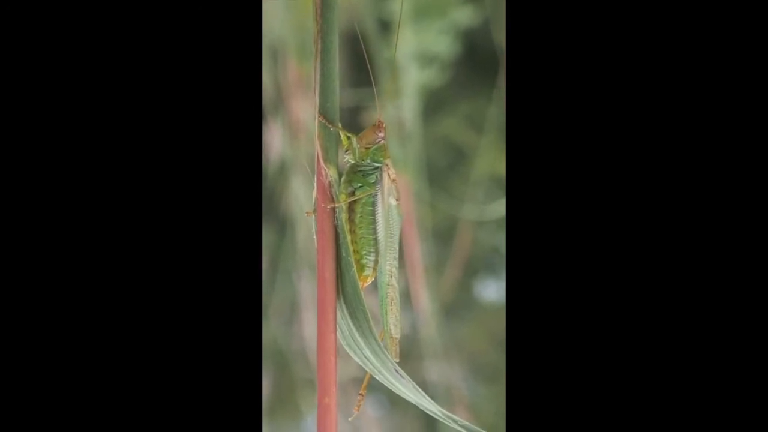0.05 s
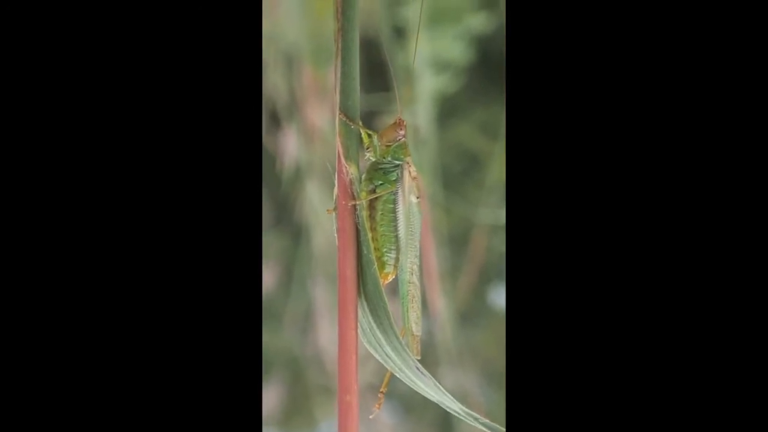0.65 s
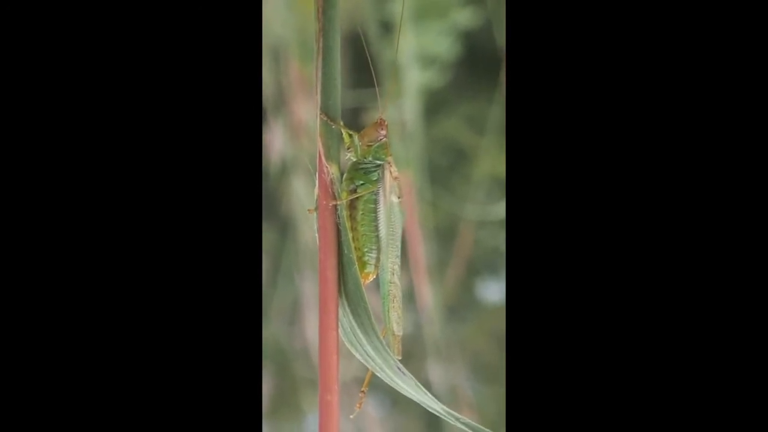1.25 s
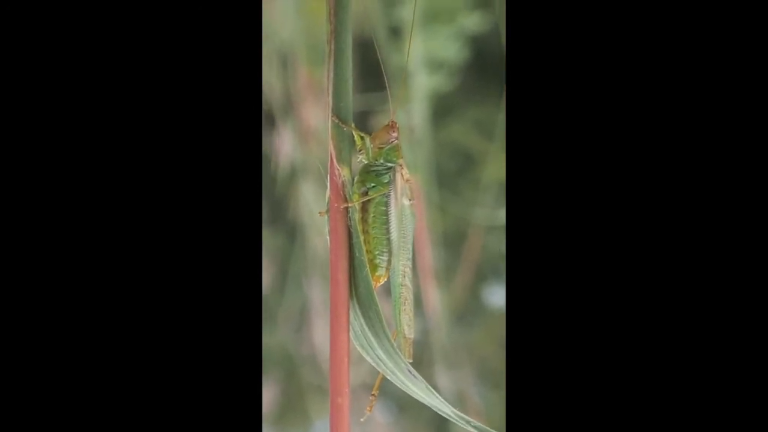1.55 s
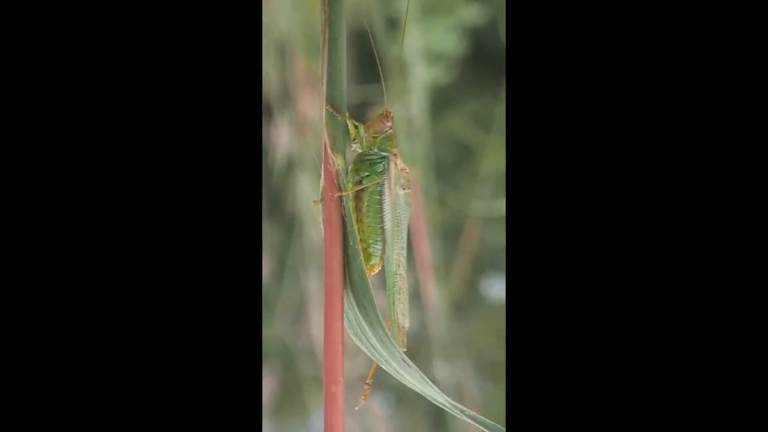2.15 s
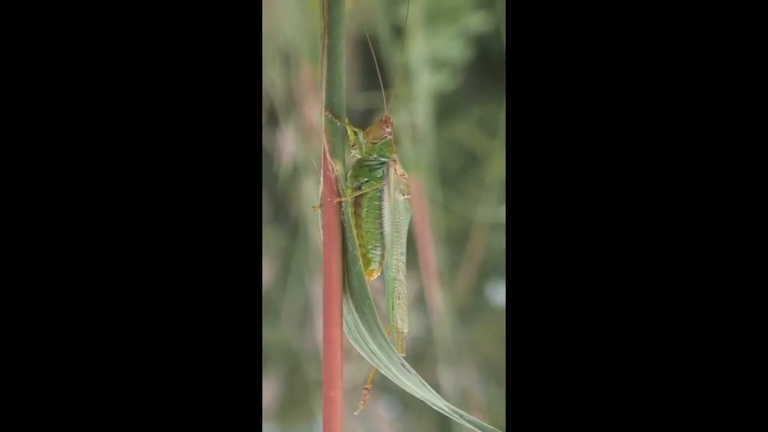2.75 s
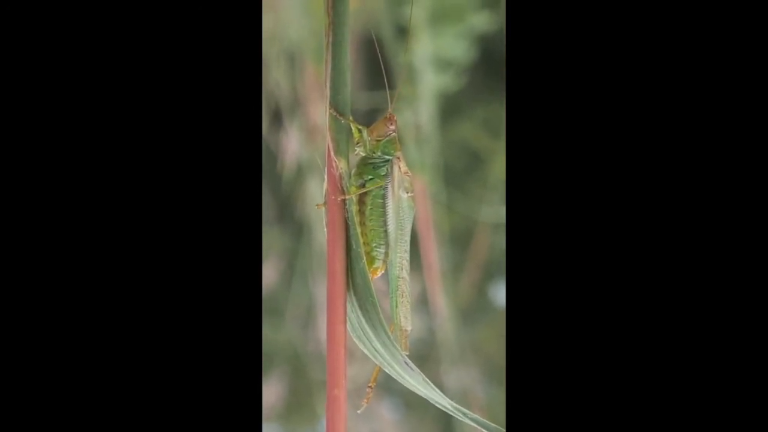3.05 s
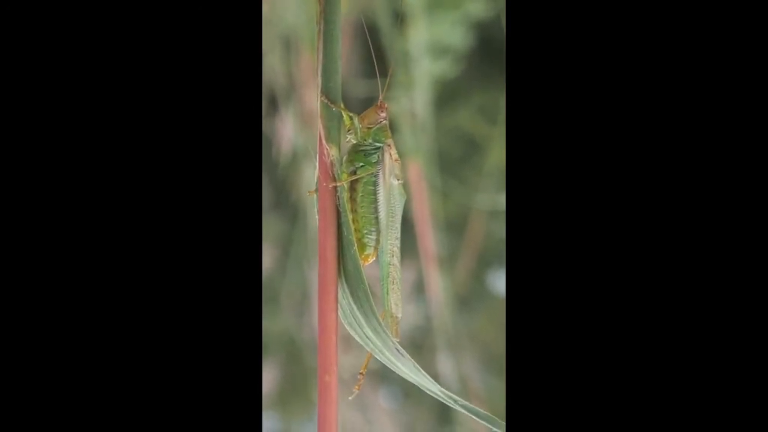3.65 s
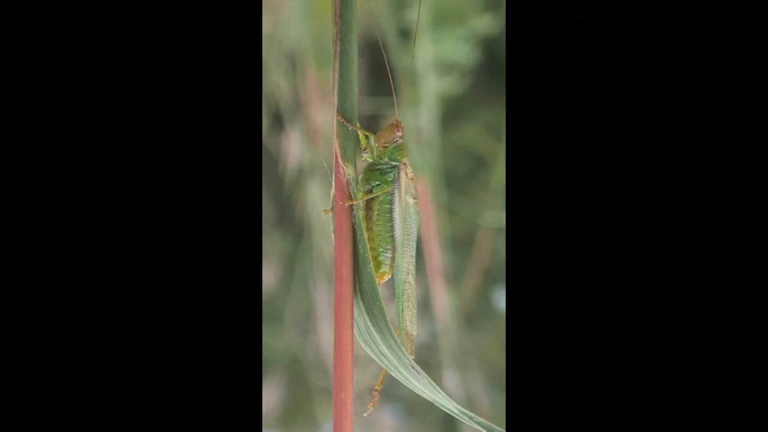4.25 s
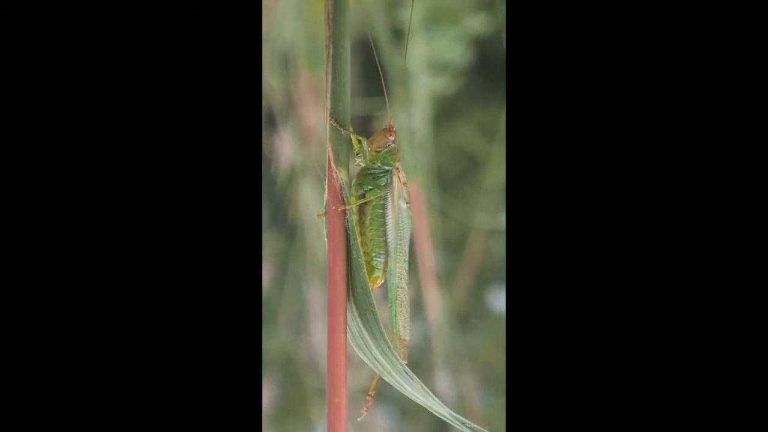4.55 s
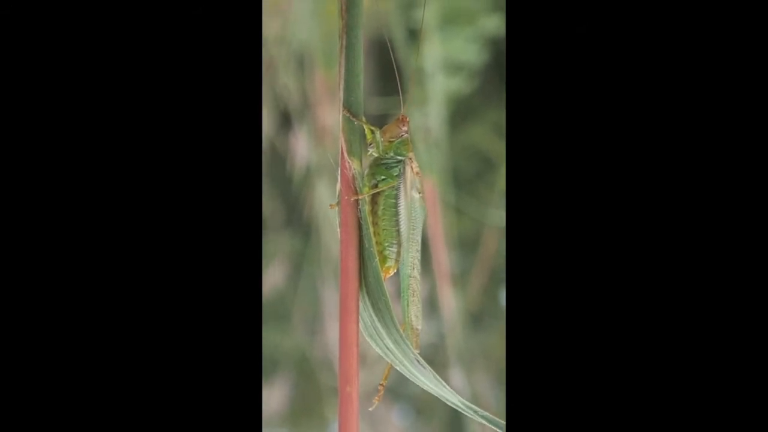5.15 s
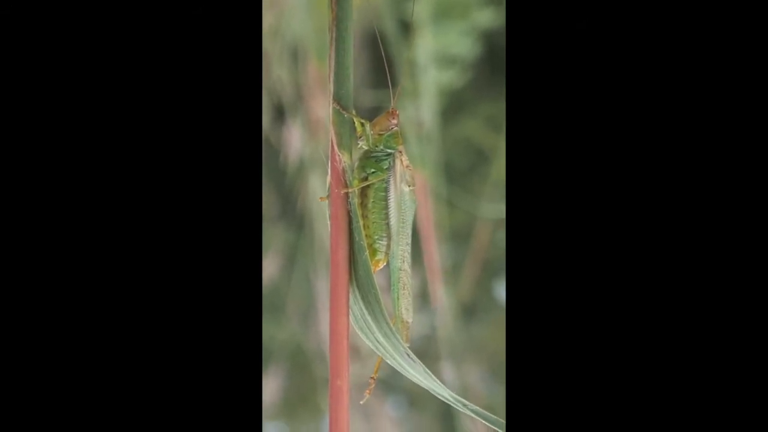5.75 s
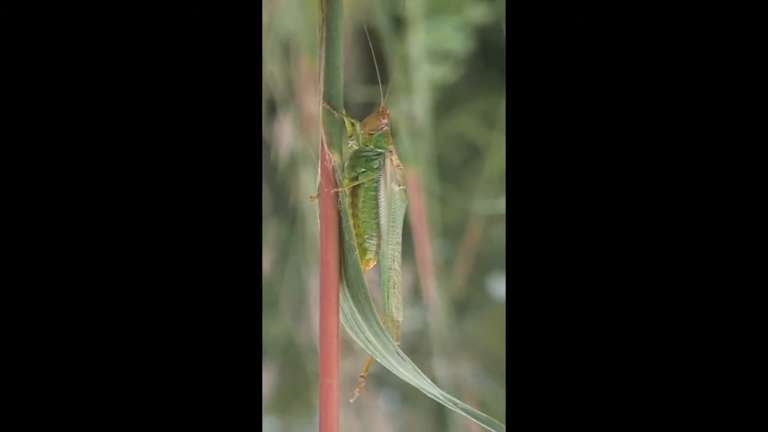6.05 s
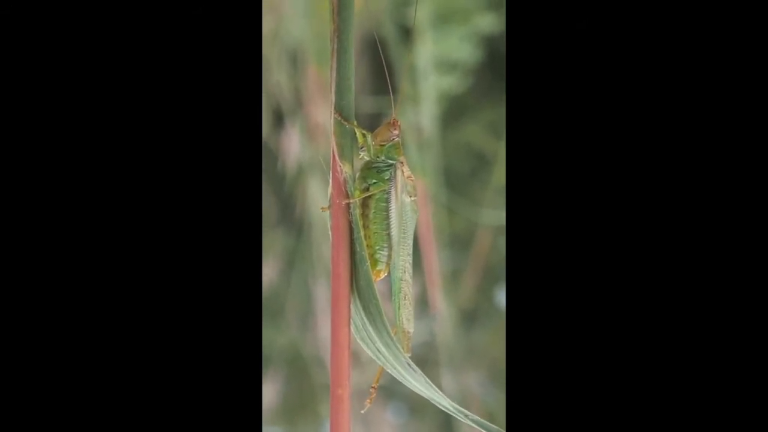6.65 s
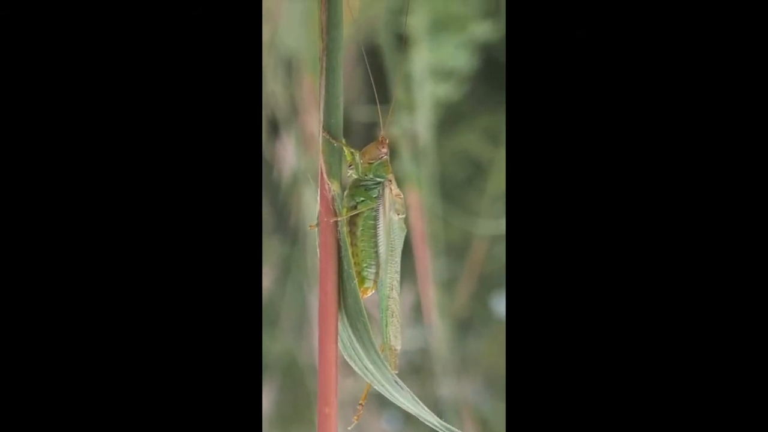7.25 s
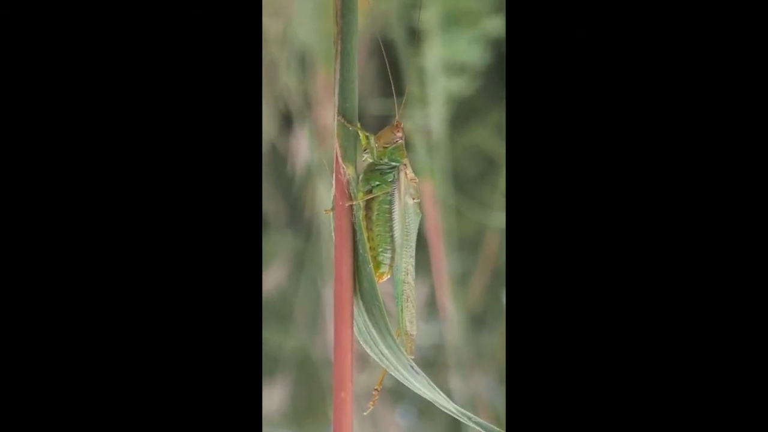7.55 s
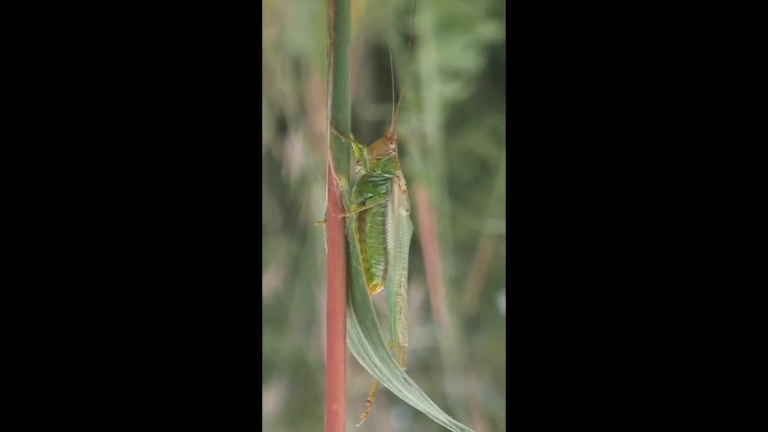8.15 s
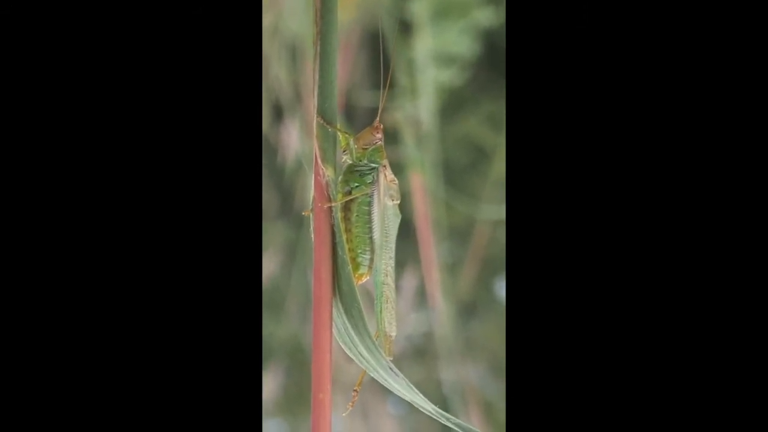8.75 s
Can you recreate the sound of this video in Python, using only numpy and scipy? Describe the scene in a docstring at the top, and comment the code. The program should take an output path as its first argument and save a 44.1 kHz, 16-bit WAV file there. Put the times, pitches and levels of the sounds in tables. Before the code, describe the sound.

Outdoors among plants, the shrill, dry buzz of a katydid is heard at close range, pulsing quickly and holding a steady level throughout. Behind it, faint crickets give short, clear chirps, scattered at first and somewhat more regular later on. The rest of the background is quiet, with only a fine hiss of distant insects and a weak low rumble.

```python
"""Outdoors among plants: a katydid sings on a stem close to the microphone, about 30 wing beats a second.
In each beat the wings open with a soft scrape, then close and drag the scraper over the file
tooth by tooth. Crickets chirp further off in near-pure tones that sink in pitch.
Behind them lie a thin insect hiss, a faint outdoor rumble and a weak hum."""
import sys
import numpy as np
from scipy import signal
from scipy.fft import rfft, irfft, next_fast_len
from scipy.io import wavfile

SR = 44100
rng = np.random.default_rng(int(sys.argv[2]) if len(sys.argv) > 2 else 0)


def pcm_store(signal):
    """Save signal as 16-bit PCM."""
    levels = np.round(np.clip(np.atleast_2d(signal), -1, 1) * 32767)
    wavfile.write(sys.argv[1], SR, levels.astype(np.int16).T)


N = 392049
T = np.arange(N) / SR

# outdoor rumble spectrum (frequency [Hz], relative level [dB])
RUMBLE_SPECTRUM = [(20, -10), (45, -4.5), (90, 0), (160, -3), (300, -7), (600, -12.5), (1200, -17),
                   (1700, -21.5), (2500, -28), (3300, -27), (4200, -39), (8000, -40)]
# distant insect hiss spectrum (frequency [Hz], relative level [dB])
HISS_SPECTRUM = [(3800, -49.5), (4500, -12), (5500, -14), (8000, -9.5), (10000, -8), (12500, -4),
                 (15000, 4.5), (16000, -10.5)]
# hum and whine (frequency [Hz], rms level [dB])
HUM_TONES = [(59.2, -66), (372, -72.5), (1281, -74.5), (1691, -81.5)]
# distant cricket groups
# (pitch [Hz], rms level [dB], pitch fall [Hz], chirp rate [1/s], first chirp [s], swell [dB])
CRICKET_GROUPS = [(5050, -56.5, 350, 3.78, .1, 4), (4730, -57, 330, 2.585, .31, 3.5),
                  (4680, -59.5, 520, 3.18, .155, 4.5)]
# nearby cricket chirps (time [s], pulses [count], first pulse peak [dB], pitch [Hz])
NEAR_CHIRPS = [(.056, 2, -43, 5030), (.356, 3, -42.5, 5030), (.754, 1, -40, 5050), (1.768, 3, -45, 5050),
               (2.099, 2, -43, 5050), (2.447, 2, -43, 5030), (2.996, 1, -42, 5050), (3.567, 1, -44, 5100),
               (3.849, 1, -43, 5050), (4.565, 2, -45, 5030), (4.91, 3, -46, 5000), (5.138, 1, -42.5, 5030),
               (5.387, 2, -44, 5030), (5.522, 1, -43, 5000), (5.68, 3, -45.5, 4980), (5.843, 2, -39, 5110),
               (6.138, 2, -39.5, 5110), (6.408, 2, -38.5, 5110), (6.474, 2, -42, 5050),
               (6.68, 2, -39, 5110), (6.942, 2, -36.5, 5110), (7.197, 2, -40, 5090),
               (7.336, 3, -43.5, 5030), (7.455, 2, -40, 5110), (7.703, 2, -39, 5110),
               (8.02, 2, -37.5, 5110), (8.155, 1, -41, 5050), (8.264, 2, -38, 5110),
               (8.582, 2, -38.5, 5110), (8.85, 1, -41, 5050)]
# katydid tempo, slowing slightly (time [s], beat rate [1/s])
BEAT_RATE = [(0, 30.32), (.75, 29.995), (2, 30.22), (3.4, 30.205), (4.4, 30.03), (5.6, 29.675),
             (6.3, 29.97), (7.1, 29.66), (7.6, 29.52), (8.89, 29.02)]
# scraper skips part of the file (time [s], skip [beats], recovery [s])
SCRAPER_SKIPS = [(7.4855, .16, .024), (7.5205, .21, .031)]
# singing effort (time [s], closing gain [dB], opening gain [dB])
STROKE_GAINS = [(0, 1, 0.1), (1.3, 1.2, 0.1), (2.4, 1.4, -0.2), (4, 1.3, -0.5), (6, 1, -1.1),
                (8.89, 1, -0.7)]
# sliding friction, loudest as the wings open (phase [beats], relative level [dB])
SLIDE_FRICTION = [(0, -11), (.03, -24), (.08, -26), (.12, -6.5), (.15, -2), (.22, 0), (.27, 0), (.32, -3),
                  (.37, -14), (.41, -9), (.5, -15), (.6, -14), (.85, -25), (.93, -13), (.97, -7.5),
                  (1, -11)]
# wing response while opening (frequency [Hz], gain [dB])
OPENING_RESPONSE = [(3600, -59), (4500, -22.5), (5400, -18.5), (6300, -11.5), (6850, -8.5), (7200, -4),
                    (8300, 0.5), (8900, -12.5), (9700, -14.5), (11200, -22), (15500, -7.5)]
# wing response as the scraper catches (frequency [Hz], gain [dB])
CATCH_RESPONSE = [(4000, -60), (5500, -32), (6700, -14), (7300, -1), (8400, 0), (8900, -8), (10100, -7),
                  (11200, -20), (15500, -22)]
# scraper on the file while closing (phase [beats], tooth rate [Hz], relative force [dB])
FILE_STROKE = [(.388, 1650, -11.5), (.43, 1560, -9), (.48, 1330, -7), (.56, 1140, -4.2), (.65, 1010, -1.2),
               (.75, 1050, -.2), (.83, 1020, .1), (.87, 1400, -.2), (.92, 1750, -2), (.96, 2300, -4.5),
               (.99, 2400, -11)]
# wing response while closing (frequency [Hz], gain [dB])
CLOSING_RESPONSE = [(3500, -74.5), (4400, -38.5), (5500, -22.5), (6600, -35), (8100, -23.5), (9700, -25),
                    (10900, -12.5), (11800, -14), (12700, -9.5), (13400, -1.5), (14200, -0.5), (15000, 5),
                    (15800, -2.5)]
# left-right level and phase difference (frequency [Hz], left minus right [dB], left lead [rad])
STEREO_BALANCE = [(100, .9, 0), (5000, .9, 0), (6000, .3, 0), (8400, 1.8, 0), (11000, 2.1, 0),
                  (12600, .3, 0), (14000, .5, -.1), (14350, 2, -.62), (14650, 0, -.7), (15100, 0, -.72),
                  (15600, -2.1, -.7)]


def undb(db):
    """Decibels to gain."""
    return 10 ** (np.asarray(db) / 20)


def level(x, db):
    """Scale to an rms level."""
    return x * undb(db) / np.sqrt(np.mean(x ** 2))


def on_log_axis(hz, points_hz, values):
    """Interpolate over log frequency."""
    return np.interp(np.log(hz + 1), np.log(points_hz), values)


def colour(x, response, size=4096):
    """Minimum-phase filter from (frequency [Hz], gain [dB]) points."""
    gain_db = on_log_axis(np.fft.rfftfreq(size, 1 / SR), *np.transpose(response))
    cepstrum = irfft(np.log(undb(gain_db)))
    cepstrum[1:size // 2] *= 2
    cepstrum[size // 2 + 1:] = 0
    return signal.fftconvolve(x, irfft(np.exp(rfft(cepstrum))))[:N]


def drift(rate_hz):
    """Smooth random curve, spread near 1."""
    knots = rng.standard_normal(int(N / SR * rate_hz) + 2)
    return np.interp(T * rate_hz, np.arange(len(knots)), knots)


def clicks(times_s, sizes, half_width=8):
    """Impulses placed between samples by a windowed sinc."""
    out = np.zeros(N)
    index = (times_s * SR).astype(int)[:, None] + np.arange(1 - half_width, half_width + 1)
    offset = index - times_s[:, None] * SR
    shape = np.sinc(offset) * np.cos(np.pi * offset / (2 * half_width)) ** 2
    np.add.at(out, np.clip(index, 0, N - 1), sizes[:, None] * shape * (index >= 0) * (index < N))
    return out


def leaf_echo(x, t60_s, spread):
    """Diffuse echoes off leaves and stems, partly different per channel."""
    t = T[:SR // 4]
    mid, side = rng.standard_normal((2, len(t))) * 1000. ** (-t / t60_s)
    tails = [level(mid + sign * spread * side, 0) / np.sqrt(len(t)) for sign in (1, -1)]
    return np.array([signal.fftconvolve(x, tail)[:N] for tail in tails])


def air(spectrum, rms_db, spread, drift_db):
    """Wide, slowly drifting noise bed, narrower in the bass."""
    mid, side = (colour(rng.standard_normal(N), spectrum) for _ in range(2))
    side = spread * colour(side, [(30, -4), (90, -7), (200, -1.5), (700, -3)])
    return level(np.array([mid + side, mid - side]) * undb(drift_db * drift(3)), rms_db)


def hum(waver_hz=4, waver_db=2):
    """Weak tones wavering in pitch and level."""
    out = 0
    for hz, rms_db in HUM_TONES:
        tone = np.sin(2 * np.pi * np.cumsum(hz + waver_hz * drift(25)) / SR)
        out += level(tone * undb(waver_db * drift(3)), rms_db)
    return out


def cricket_pulses(times_s, peaks_db, pitches_hz, fall_hz, length_s):
    """One near-pure tone per wing stroke: quick swell, pitch sinking as it fades."""
    out = np.zeros(N + SR)
    progress = np.arange(int(length_s * SR)) / (length_s * SR)
    swell = np.sin(np.pi * np.sqrt(progress)) ** 2
    for time_s, peak_db, hz in zip(times_s, peaks_db, pitches_hz):
        start = int(max(time_s, 0) * SR)
        tone = np.sin(2 * np.pi * np.cumsum(hz - fall_hz * progress ** 2) / SR)
        out[start:start + len(tone)] += undb(peak_db) * swell * tone
    return out[:N]


def far_crickets(pulse_rate_hz=55):
    """Overlapping pulses blurred by vegetation; each group swells at its own chirp rate."""
    grid_s = np.arange(0, N / SR, 1 / pulse_rate_hz)
    out = 0
    for pitch_hz, rms_db, fall_hz, chirp_rate_hz, first_s, swell_db in CRICKET_GROUPS:
        gain_db, detune_hz, jitter_s = (rng.standard_normal((len(grid_s), 3)) * [2.9, 55, .012]).T
        song = cricket_pulses(grid_s + jitter_s, gain_db, pitch_hz + detune_hz, fall_hz, length_s=.0198)
        blurred = song + leaf_echo(song, t60_s=.089, spread=.17)
        swell = undb(swell_db * np.cos(2 * np.pi * chirp_rate_hz * (T - first_s)))
        out += level(swell * blurred, rms_db)
    return out


def near_crickets(spacing_s=.047, rise_db=1, lead_s=.002, echo_db=-9):
    """Chirps of one to three evenly spaced pulses, each louder than the last."""
    pulses = [(start_s + k * spacing_s - lead_s, first_db + k * rise_db, hz)
              for start_s, count, first_db, hz in NEAR_CHIRPS for k in range(round(count))]
    times_s, peaks_db, pitches_hz = np.transpose(pulses)
    pitches_hz += 20 * rng.standard_normal(len(pulses))
    song = cricket_pulses(times_s, peaks_db, pitches_hz, fall_hz=700, length_s=.0267)
    return song + undb(echo_db) * leaf_echo(song, t60_s=.2, spread=.3)


def wing_beats(start_beats=.797):
    """Running katydid beat count; jumps ahead at each skip, then falls back in step."""
    beats = start_beats + np.cumsum(np.interp(T, *np.transpose(BEAT_RATE))) / SR
    for time_s, skip_beats, recover_s in SCRAPER_SKIPS:
        beats += skip_beats * (T > time_s) * np.maximum(1 - ((T - time_s) / recover_s) ** 2, 0)
    return beats


def opening_stroke(beats, slide_db=-35.7, catch_db=-45, catch_phase=.3, contact_rate_hz=2400):
    """The scraper slides back in light, uneven contacts and catches just before the wings turn."""
    phase = (beats + .007 * drift(25)) % 1
    grid_s = np.arange(0, N / SR, 1 / contact_rate_hz)
    contacts = clicks(grid_s + rng.random(len(grid_s)) / contact_rate_hz, np.ones(len(grid_s)))
    friction = undb(np.interp(phase, *np.transpose(SLIDE_FRICTION)))
    grip = np.exp(-.5 * ((phase - catch_phase) / .02) ** 2)
    slide = colour(contacts * friction, OPENING_RESPONSE)
    catch = colour(contacts * grip, CATCH_RESPONSE)
    return level(slide, slide_db) + level(catch, catch_db)


def closing_stroke(beats, rms_db=-26.5, rasp_db=-17, rasp_decay_teeth=.25, speed_spread=.022):
    """Each file tooth kicks the wing, which rings briefly and rasps as the scraper slips."""
    knots, tooth_hz, force_db = np.transpose(FILE_STROKE)
    phase = (beats + .006 * drift(25)) % 1
    force = undb(np.interp(phase, knots, force_db)) * (phase > knots[0]) * (phase < knots[-1])
    teeth = np.cumsum(np.interp(phase, knots, tooth_hz) * (1 + speed_spread * drift(90))) / SR
    strikes_s = np.interp(np.arange(1, teeth[-1]), teeth, T)
    # even file, steady stroke: little scatter
    jitter_s, jitter_db = (rng.standard_normal((len(strikes_s), 2)) * [8e-6, .7]).T
    strikes = clicks(strikes_s + jitter_s, np.interp(strikes_s, T, force) * undb(jitter_db))
    rasp = force * np.exp(-(teeth % 1) / rasp_decay_teeth) * rng.standard_normal(N)
    drive = level(strikes, 0) + level(rasp, rasp_db)
    return level(colour(drive, CLOSING_RESPONSE), rms_db)


def katydid(echo_db=-22, closing_waver_db=.35, opening_waver_db=.4, lift_s=.005, lift_db=-20):
    """Alternating strokes of wavering strength; the scraper lifts off briefly before each skip."""
    beats = wing_beats()
    times_s, closing_db, opening_db = np.transpose(STROKE_GAINS)
    closing_gain = undb(np.interp(T, times_s, closing_db) + closing_waver_db * drift(20))
    opening_gain = undb(np.interp(T, times_s, opening_db) + opening_waver_db * drift(20))
    lifted = sum(np.exp(-((T - skip_s) / (lift_s / 2) + 1) ** 4) for skip_s, _, _ in SCRAPER_SKIPS)
    strokes = closing_gain * closing_stroke(beats) + opening_gain * opening_stroke(beats)
    song = undb(lift_db * lifted) * strokes
    return song + undb(echo_db) * leaf_echo(song, t60_s=.1, spread=1.3)


def scene():
    """Katydid in front; crickets, air and hum behind."""
    rumble = air(RUMBLE_SPECTRUM, rms_db=-51.5, spread=1.055, drift_db=.4)
    hiss = air(HISS_SPECTRUM, rms_db=-39.5, spread=.38, drift_db=.3)
    return katydid() + near_crickets() + far_crickets() + rumble + hiss + hum()


def record(dry, cutoff_hz=15750):
    """Left-right level and phase difference by frequency, widening the top treble; steep low-pass."""
    size = next_fast_len(N + SR // 10, True)
    hz = np.fft.rfftfreq(size, 1 / SR)
    points_hz, balance_db, lead_rad = np.transpose(STEREO_BALANCE)
    left_gain = undb(on_log_axis(hz, points_hz, balance_db) / 2)
    left = left_gain * np.exp(.5j * on_log_axis(hz, points_hz, lead_rad))
    low_pass = 1 / np.sqrt(1 + (hz / cutoff_hz) ** 500)
    return irfft(rfft(dry, size) * np.array([left, 1 / left]) * low_pass, size)[:, :N]


dry = scene()
out = record(dry)
pcm_store(out)
```